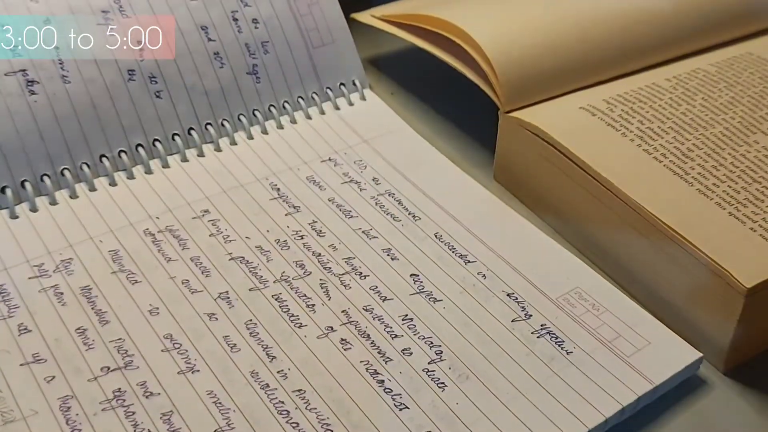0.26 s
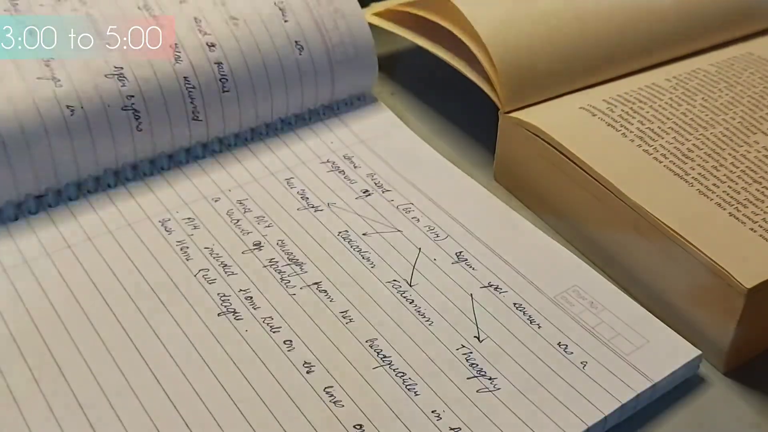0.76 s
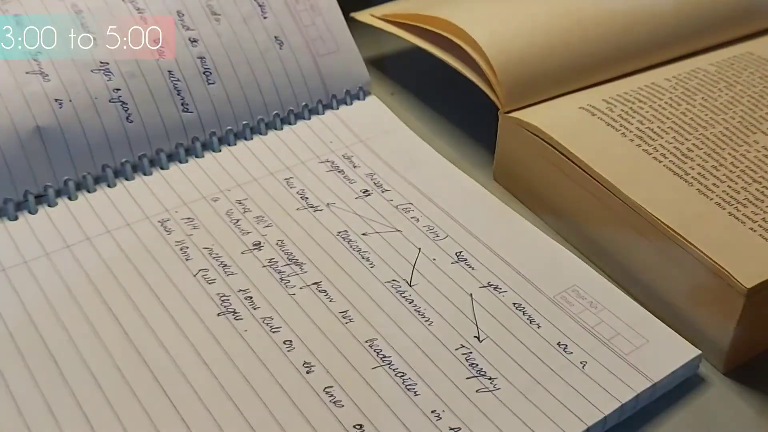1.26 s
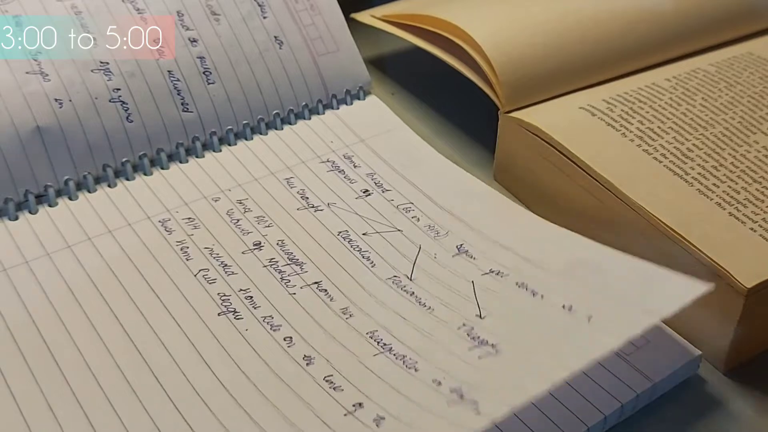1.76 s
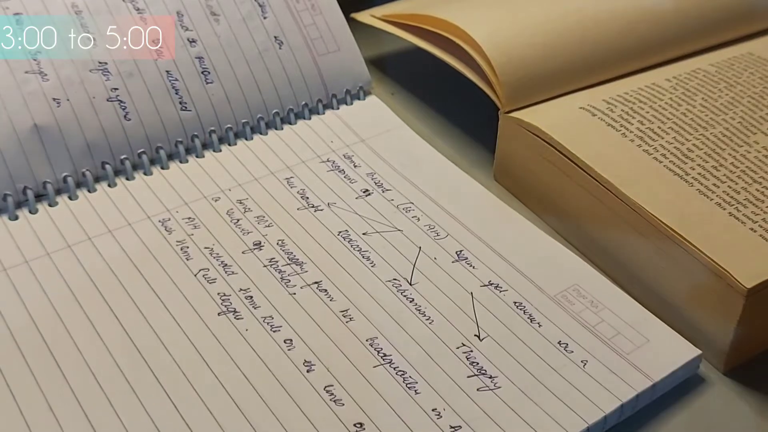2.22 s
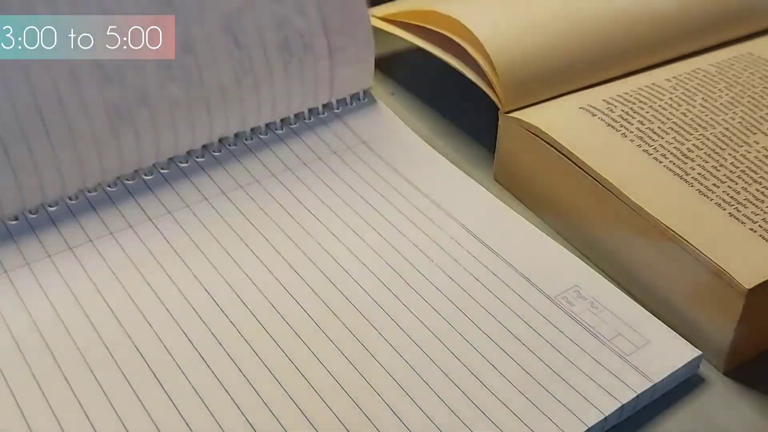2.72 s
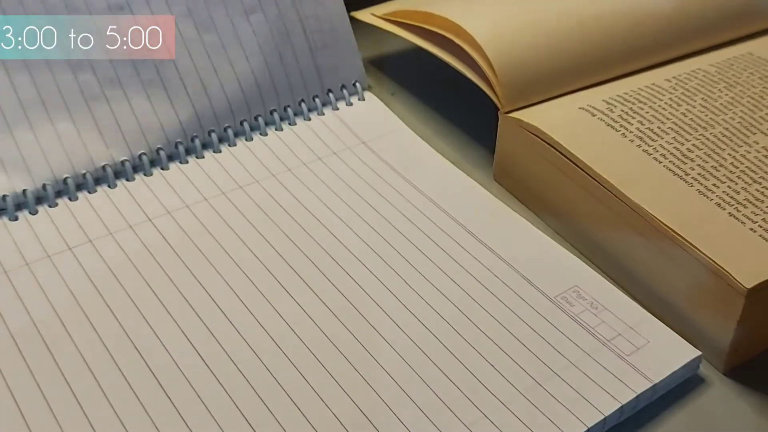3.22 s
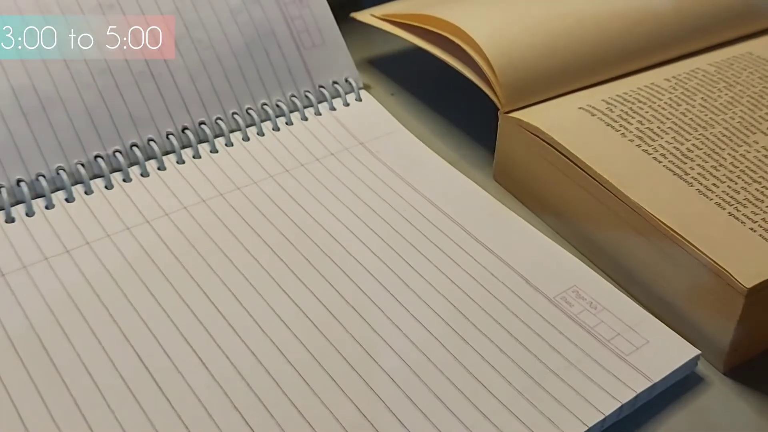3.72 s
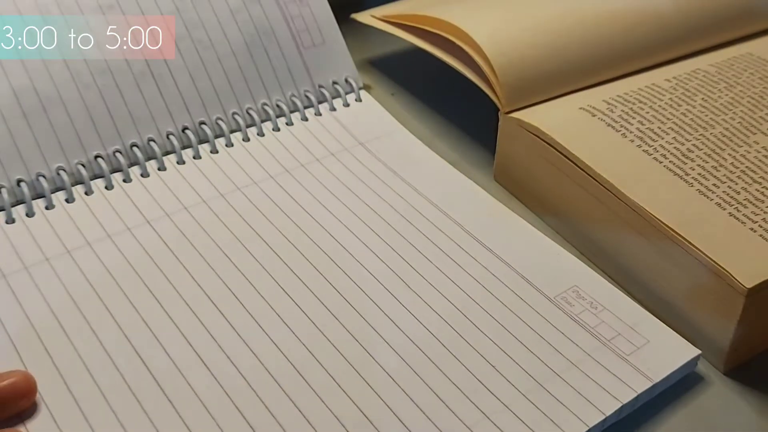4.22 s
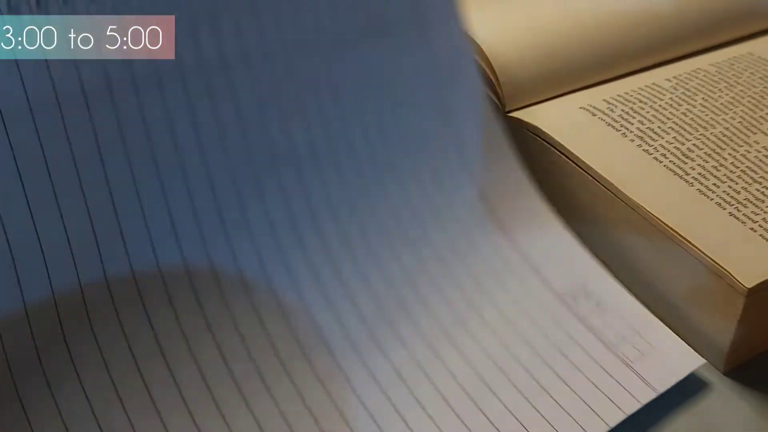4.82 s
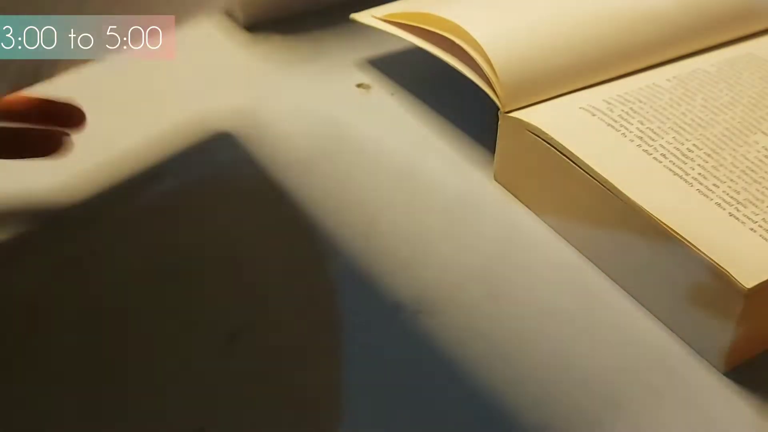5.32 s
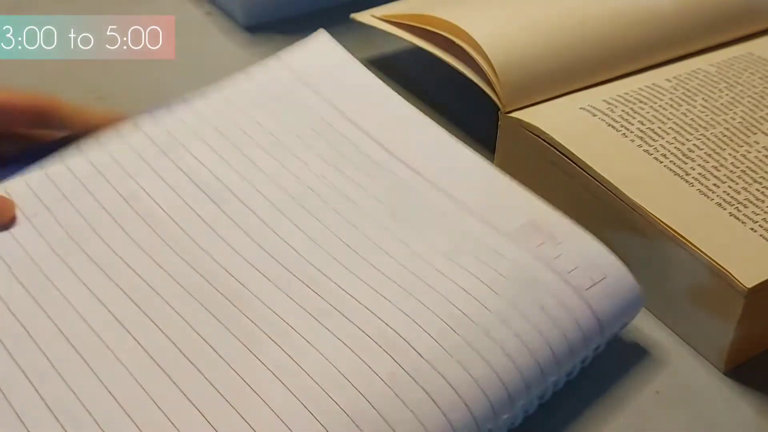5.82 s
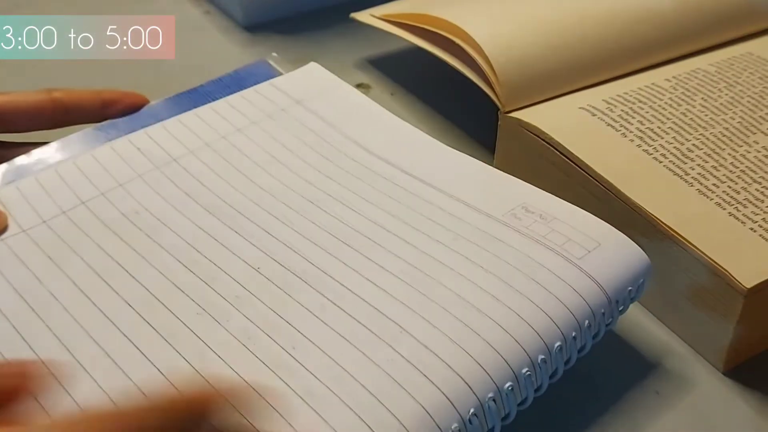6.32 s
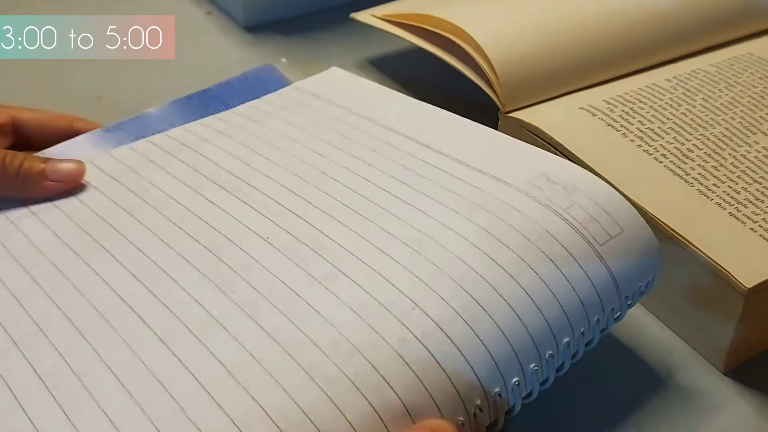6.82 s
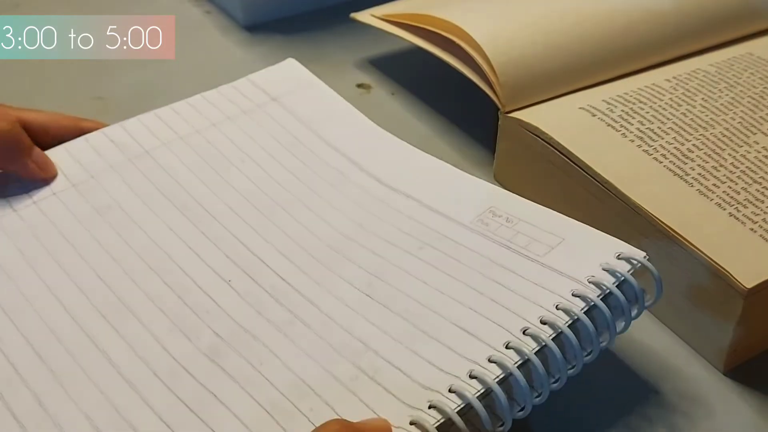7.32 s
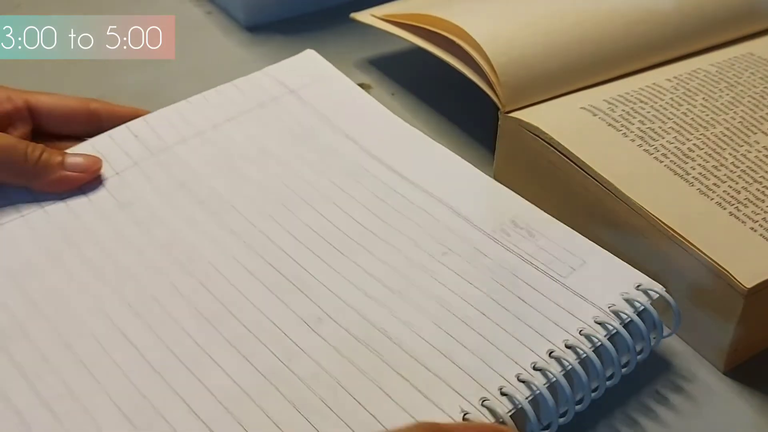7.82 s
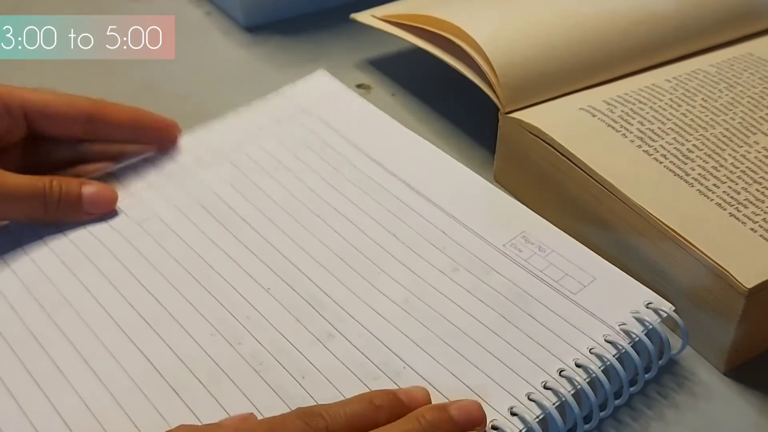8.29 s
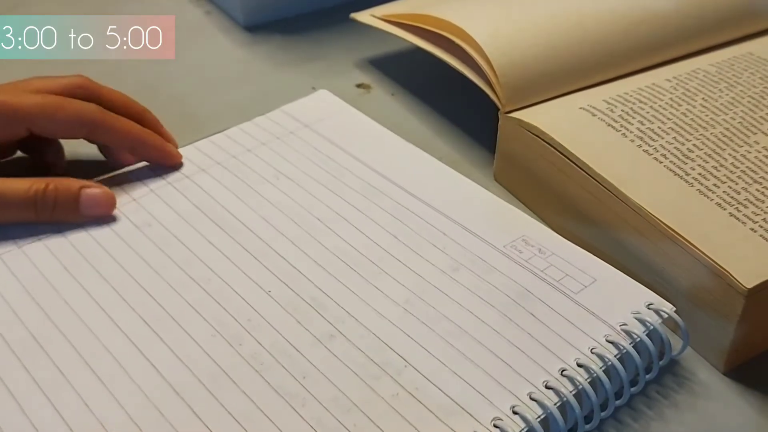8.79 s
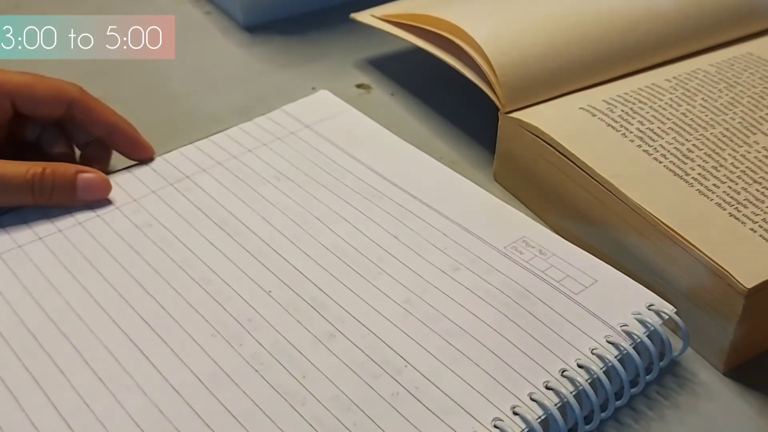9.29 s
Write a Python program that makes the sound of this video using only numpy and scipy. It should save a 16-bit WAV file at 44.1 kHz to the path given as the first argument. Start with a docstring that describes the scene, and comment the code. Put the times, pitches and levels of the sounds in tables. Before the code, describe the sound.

A quiet room with a low hum and slight microphone hiss; a very faint, far-off horn-like tone hovers at the start and again around 1.5-2.6 s. At 0.3 s a page swishes brightly, snapping hard at 0.5 s with flapping and crackling until about 0.8 s, the loudest moment. Light rustles and a faint hollow scrape follow from 1 s. Another page flips at 2.6-2.9 s with clean, sharp pops, then crinkles at 3.1-3.6 s. Soft brushing leads into the notebook being lifted and turned over around 4.7-5.7 s, with a muted scrape and small bumps. A crisp snap lands at 5.9 s. From 6 s hands shuffle and smooth the paper gently, the hollow desk answering in low soft booms, notably at 7.3 s, with a dull thud at 8.4 s and a low rumble just after. Faint rustling continues to 9.5 s. Close, dry stereo.

```python
"""A quiet room hums under a faint far-off tone, perhaps a horn; then hands turn the pages of a
ring-bound notebook, flip it over and smooth it flat on a hollow desk, close to two microphones.
Paper is shaped noise (hiss, crackle, flap) with snaps and clean pops; scrapes are resonant noise.
The desk top booms as ringing modes driven by knocks and by noise from the shuffling hands.
The tones are gliding sines, early on; the room is coloured noise, shared in the bass only."""
import sys
import numpy as np
from scipy import signal
from scipy.fft import rfft, irfft, next_fast_len
from scipy.io import wavfile
from scipy.ndimage import uniform_filter1d

SR = 44100
rng = np.random.default_rng(int(sys.argv[2]) if len(sys.argv) > 2 else 0)


def generate_wav(sig):
    """Save sig (samples, or channels by samples) to the path in sys.argv[1] as 16-bit PCM at SR."""
    pcm = np.round(np.clip(np.atleast_2d(sig).T, -1, 1) * 32767).astype(np.int16)
    wavfile.write(sys.argv[1], SR, pcm)


N = 421155  # length in samples
T = np.arange(N) / SR  # seconds


def paper():
    """Sliding hiss, bending crackle and page flap: noise under slow swells, fine grain and sharp snaps."""
    # each movement of the paper swells, holds and dies away; rise and fall are times per 20 dB:
    # full_at_s, rise_ms, hold_ms, fall_ms, hiss_db, crackle_db, flap_db
    moves = [(0.003, 61.0, 17, 102, -73, -77, -70.5), (0.142, 93.0, 30, 67, -68, -88, -79.0),
             (0.299, 16, 73, 22.0, -41, -48.5, -69), (0.387, 62, 30, 171, -29.5, -40.5, -68),
             (0.499, 74, 7.4, 193.0, -43, -34.5, -36.5), (0.616, 161.0, 46, 112, -36, -36, -36.5),
             (0.953, 7, 34.0, 78.0, -69, -60.0, -54), (1.07, 131, 54, 128, -61.5, -54, -54),
             (1.167, 78.0, 13.0, 132.0, -61.0, -53.5, -75), (1.262, 42, 19, 86, -67, -61.5, -54),
             (1.367, 10.0, 21, 215, -83, -64.5, -65.5), (1.536, 264, 6.1, 299, -65.5, -87.0, -79),
             (1.724, 80, 43, 193, -53, -58.5, -66.5), (1.823, 15.0, 15.0, 251.5, -69.0, -73, -67.5),
             (2.053, 4, 49, 145, -62.5, -60, -62.0), (2.08, 9, 6.0, 392, -62, -84.5, -63.5),
             (2.416, 85.5, 24, 124, -65.5, -81, -93), (2.577, 11, 58, 25.0, -50, -54.5, -46.5),
             (2.598, 244, 10.0, 20.0, -58.5, -63, -77.0), (2.676, 91, 27, 155.0, -56, -55, -41.5),
             (2.777, 67, 20, 88, -38.5, -38, -37.5), (2.888, 72, 30, 105, -53.5, -55, -53.5),
             (3.154, 11, 52, 218.0, -51, -51, -48), (3.247, 60, 20, 92, -49, -41, -43),
             (3.416, 207, 38, 138, -62, -47.5, -54.0), (3.502, 49, 18, 148, -44.5, -42, -49.0),
             (3.705, 398.0, 48, 12, -57.5, -73, -67), (3.865, 408, 68, 72.5, -51, -68, -74.5),
             (4.394, 106.0, 7.5, 100, -66.5, -80.5, -78), (4.499, 78, 59.0, 395, -71.0, -81.5, -71.5),
             (4.669, 96, 43.0, 388.0, -61, -66, -63), (4.74, 47, 29, 89.0, -55.5, -64.5, -70),
             (4.849, 90.0, 14, 194.0, -66, -72, -57.5), (4.957, 91, 91.0, 34.0, -57, -65, -63),
             (5.079, 140, 16, 112, -54.0, -60.5, -60.5), (5.178, 35, 23, 198, -61.0, -65.0, -56.5),
             (5.284, 49, 12, 20, -58.5, -60.5, -55.5), (5.386, 13.0, 70, 145, -62, -68.5, -65.5),
             (5.574, 141.0, 16.0, 89.0, -68.0, -72, -71), (5.716, 41, 14, 26, -64, -60.5, -47.5),
             (5.743, 263.0, 120, 263.0, -61.5, -65, -59.5), (5.892, 49, 4.0, 144, -50, -50, -49.5),
             (6.126, 398.0, 33, 53.0, -71, -72, -60), (6.235, 176.0, 17.0, 109.0, -72.5, -70.5, -68.5),
             (6.393, 15, 26, 36, -48.0, -60.5, -64), (6.506, 260, 38.0, 197.0, -59, -64.5, -74),
             (6.58, 8, 28.0, 154.0, -59, -68.0, -70), (6.697, 52.0, 14, 111, -64.5, -72, -61.5),
             (6.769, 27.0, 20.0, 86, -72, -66, -64.5), (6.833, 129.0, 120, 74, -69, -70, -70.5),
             (7.145, 160.0, 40, 20, -57.5, -59, -55), (7.236, 186.0, 66, 63, -56.0, -59, -56),
             (7.333, 153.0, 8.4, 351.5, -72.5, -86, -70.5), (7.725, 128.0, 5.0, 275.0, -63.5, -66, -64.5),
             (7.953, 54, 20.0, 228.0, -71.0, -72.5, -71), (8.062, 126, 8.0, 115, -59.5, -69.0, -70),
             (8.162, 30, 21.0, 160, -65, -72, -67), (8.346, 72.0, 6.7, 392.0, -67.5, -78.5, -68.5),
             (8.474, 63.0, 13, 46.0, -65.5, -79.0, -69), (8.586, 116, 30, 206.0, -61.0, -74, -68),
             (8.79, 171.0, 97, 208, -68.5, -82, -72), (8.996, 62, 66.0, 80.0, -70.5, -84, -69.5),
             (9.174, 287.0, 12.5, 78, -62.5, -69, -67), (9.28, 196, 7.6, 54.0, -68.5, -72.5, -86.5)]
    # the lower layers swell and die more slowly; one row each for hiss, crackle, flap:
    # rise_stretch, fall_stretch [factors]
    stretches = [(1, 1), (1.1, 1.3), (1.2, 1.51)]
    # the sheet buckles or slaps: start_s, crackle_peak_db, hiss_peak_db, flap_peak_db,
    # t60_s (kept within 0.004 to 0.09)
    snaps = [(0.2872, -59, -33.5, -55, 0.0096), (0.4881, -16, -23.5, -25.5, 0.029),
             (0.554, -31.5, -48, -36, 0.035), (0.6352, -32.5, -42, -28, 0.026),
             (0.696, -34, -60, -53.5, 0.024), (0.7206, -41.5, -71, -47.5, 0.15),
             (0.7476, -47, -50, -35.5, 0.065), (0.9519, -46, -69, -39, 0.015),
             (1.1708, -48, -47, -51, 0.019), (1.2896, -44.5, -64, -52, 0.009),
             (1.3627, -42.5, -51, -48.5, 0.017), (1.827, -55, -55, -64, 0.032),
             (2.047, -66, -71, -70, 0.017), (2.0818, -43, -43.5, -49, 0.028),
             (2.2435, -59, -50.5, -70, 0.011), (2.5633, -57.5, -76, -45, .012),
             (2.58, -43, -68, -40.5, 0.0086), (2.6142, -37.5, -71, -44, 0.05),
             (2.6764, -65, -70, -38, 0.017), (2.7303, -30.5, -63, -31.5, 0.039),
             (2.7684, -31.5, -27, -55.5, 0.016), (2.7866, -32.5, -54, -48.5, 0.044),
             (3.1745, -43, -55, -54, 0.04), (3.2265, -39, -63, -46.5, 0.012),
             (3.2546, -35, -53, -57, 0.013), (3.3256, -39.5, -54, -49, 0.0095),
             (3.475, -36.5, -70, -59, 0.0093), (4.9122, -60, -55, -52, 0.02),
             (5.0814, -49, -55, -58, 0.026), (5.1921, -78, -55, -36.5, 0.0099),
             (5.6436, -75, -60, -55, 0.01), (5.715, -56, -75, -55, 0.009), (5.772, -63, -73, -67, 0.014),
             (5.8912, -40, -33, -43, 0.016), (5.8985, -29, -43, -28.5, 0.014),
             (6.1554, -56, -62, -58, 0.024), (6.382, -69, -53, -80, 0.029), (6.6976, -66, -72, -60, 0.017),
             (6.228, -65, -80, -56, 0.013), (6.779, -68, -80, -59, 0.025), (7.0066, -69, -82, -55, 0.016),
             (7.0626, -55, -70, -67, 0.0083), (7.9517, -62, -56.5, -65, 0.029),
             (8.1701, -55.5, -54, -51, 0.014), (8.361, -70, -67, -50, 0.0083),
             (8.4715, -70, -74, -67, 0.027), (8.562, -70, -54, -70, 0.01)]
    # single clean pops of a flattening fold, level ahead of the stereo split:
    # peak_s, peak_db, centre_hz
    pops = [(.2865, -44, 9000), (.7505, -24, 450), (.955, -34, 617), (1.362, -56, 4960), (2.245, -54, 5960),
            (2.731, -18, 1310), (2.77, -9, 6000), (5.191, -39.5, 350), (5.8993, -29, 2500),
            (8.562, -57, 5000)]
    # relative spectrum of each layer: pitch_hz, level_db
    hiss = [(2200, -28.5), (3000, -6), (5000, 0), (8000, -0.5), (11500, 1.5), (14000, -1.5), (16000, -6.5)]
    crackle = [(1000, -25.5), (1500, -12), (2000, -6.5), (2400, -4), (2900, -6.5), (4300, -7.5),
               (6000, -13), (9000, -23.5)]
    flap = [(130, -13), (200, -10.5), (300, -2.5), (460, -3.5), (800, -5.5), (1200, -8), (1700, -10.5),
            (2300, -18)]

    full_at, rise, hold, fall, *layer_dbs = np.transpose(moves)
    levels = [swells(full_at, rise_stretch * rise, hold, fall_stretch * fall, db)
              for db, (rise_stretch, fall_stretch) in zip(layer_dbs, stretches)]
    grains = (grainy(per_s=380, spread_db=3.5, grain_s=0.0079, share=0.65),
              grainy(per_s=750, spread_db=4.5, grain_s=0.0034, share=0.84),
              grainy(per_s=28, spread_db=5.5, grain_s=0.024, share=0.4))

    out = scrapes()
    t = np.arange(4000) / SR
    bursts = np.zeros((3, N))
    for start, crackle_db, hiss_db, flap_db, t60 in snaps:
        t60 = np.clip(t60, 0.004, 0.09)
        attack = (1 - np.exp(-t / (0.013 * t60))) ** 2
        shape = attack * gain_of(-60 * t / t60)
        for burst, db in zip(bursts, (hiss_db, crackle_db, flap_db)):
            add(burst, start, gain_of(db) * shape / shape.max())

    for slow, grain, burst, colour in zip(levels, grains, bursts, (hiss, crackle, flap)):
        level = slow * grain + burst
        out += coloured(level * rng.standard_normal((3, N)), colour)

    lead_s = 0.004  # each pop's pulse peaks this long after its first sample
    for peak_s, db, hz in pops:
        u = (np.pi * hz * (t[:400] - lead_s)) ** 2
        pulse = (2 * u - 1) * np.exp(-u)  # one sharp dip between two softer humps
        add(out[0], peak_s - lead_s, gain_of(db) * pulse)
    return heard(out)


def scrapes():
    """The book scrapes on the desk: rubbing noise in one hollow resonance of the gap under it."""
    # rms level ahead of the fade and stereo split: start_s, end_s, pitch_hz, width_hz, level_db
    rubs = [(0.958, 1.34, 486, 89, -58.5), (4.476, 4.594, 820, 202.4, -70.5), (4.754, 4.965, 694, 137, -54),
            (7.05, 7.3, 840, 248, -56.5)]
    out = np.zeros((3, N))
    for start, end, hz, width, db in rubs:
        rub = signal.lfilter(*signal.iirpeak(hz, hz / width, SR), rng.standard_normal((3, N)))
        fade = np.sin(np.pi * np.clip((T - start) / (end - start), 0, 1))
        out += gain_of(db) * evened(rub) * fade
    return out


def heard(x):
    """The direct sound (first row) reaches the right microphone later; the rest scatters off desk and books."""
    # where the paper is: time_s, right_delay_ms, left_over_right_db
    place = [(0, 0.33, 5), (.45, 0.27, 2), (.6, 0.29, 2), (1, 0.35, 0.5), (1.6, 0.29, 1), (2.2, 0.26, 3.5),
             (2.9, 0.36, 2), (3.2, 0.045, 1), (3.8, 0.3, 1.7), (4.3, .3, 2.5), (5.3, 0.29, 2),
             (5.699, 0.19, 2), (6.3, 0.16, 2), (7.201, 0.015, 1), (8.2, 0.15, 2.5), (9.55, 0.25, 4.5)]
    # how alike the two sides are: pitch_hz, shared_power [0 to 1]
    likeness = [(100, 0.86), (300, 0.96), (700, 0.21), (1500, 0.57), (3000, 0.37), (7000, 0.35),
                (15000, 0.7)]
    hz, t, z = signal.stft(x, SR, nperseg=256, noverlap=192)

    # the bending sheet keeps changing colour
    patches = uniform_filter1d(rng.standard_normal(z.shape[1:]), 3, 0)
    patches = uniform_filter1d(patches, 30, 1)
    z = z * gain_of(2.0 * evened(patches))  # 2 dB rms

    time_s, delay_ms, pan_db = np.transpose(place)
    # the delay between the sides fades out from 5 to 7 kHz
    late = hz * np.clip((7000 - hz) / 2000, 0, 1)
    # half the delay and half the pan go to each side, in opposite senses
    turn = np.exp(1j * np.pi * late[:, None] * np.interp(t, time_s, delay_ms) / 1000)
    lean = gain_of(np.interp(t, time_s, pan_db) / 2)

    at_hz, share = np.transpose(likeness)
    alike = np.interp(np.log(hz + 1), np.log(at_hz), share)
    alike = np.clip(alike, 0, 1)[:, None]
    direct = np.sqrt(alike) * z[0]
    apart = np.sqrt(1 - alike) * z[1:]
    left = (direct * turn + apart[0]) * lean
    right = (direct / turn + apart[1]) / lean
    return signal.istft(np.array([left, right]), SR, nperseg=256, noverlap=192)[1][:, :N]


def desk():
    """Soft knocks and a shuffle of hands drive the same modes of the desk top."""
    # ringing modes of the board, undamped: pitch_hz, level_db, t60_s
    modes = [(96.5, -9, 0.79), (120.6, 0, 0.63), (130.4, -4, 1.1), (149, -17.5, 0.78), (183.7, -6, .6),
             (205.5, -17, .5), (254, -14, 0.88), (271, -16.5, 0.44), (300, -16, 0.53), (308, -18.5, 0.87),
             (348, -18.5, 0.51), (438, -25, 0.32)]
    # hands and book lean on the desk top; rise and fall are times per 20 dB:
    # full_at_s, rise_ms, hold_ms, fall_ms, level_db (of the driving noise)
    presses = [(0.272, 231, 6.0, 40.0, -78), (0.48, 92.0, 5.0, 104.0, -49), (0.631, 388.0, 101.0, 210, -52),
               (0.724, 20, 16, 212.0, -53), (0.913, 15.0, 28.0, 391.0, -78),
               (1.134, 179.0, 7.0, 232.0, -62.5), (1.324, 407.0, 170, 48, -63.5),
               (2.025, 114.0, 88, 19.5, -67), (2.197, 80, 47, 43.5, -64.0), (2.552, 31.0, 43.0, 15.0, -62),
               (2.727, 189.0, 5.3, 127.0, -42.5), (3.197, 217.0, 5.0, 357.0, -51.5),
               (3.38, 9, 55.0, 162.0, -56), (3.522, 6.0, 269.0, 65.0, -59.5), (3.888, 92.0, 44, 69.0, -56),
               (4.08, 312.5, 58, 73.5, -64.5), (4.32, 216.5, 29.0, 98.5, -65.5),
               (4.576, 348, 7.0, 114, -62.5), (4.804, 144.0, 7.0, 221.0, -59.5),
               (5.171, 365.0, 4.0, 404, -56.5), (5.727, 99, 4.3, 143, -47), (5.866, 41, 29, 197, -45),
               (6.032, 9.0, 75, 114, -52.5), (6.132, 95, 7.3, 181.0, -52.5), (6.347, 45, 64, 74, -58.5),
               (6.61, 272.0, 8.3, 129, -52), (6.817, 409, 100, 406.0, -65),
               (7.278, 134.0, 4.4, 177.5, -46.0), (7.498, 45, 125.0, 169, -60.5),
               (8.223, 209, 7.3, 58.0, -49.5), (8.529, 233, 8.8, 156, -41), (8.717, 29, 43.0, 377.0, -53),
               (8.968, 39.0, 19.0, 151, -52.5), (9.275, 407.0, 47.0, 406, -65.5)]
    # the desk is knocked, peak ahead of the bass cut and pan: start_s, peak_db
    blows = [(5.19, -47.5), (5.71, -50), (5.9, -52), (8.36, -18.5)]
    rest_db = -78.5  # hands resting

    t = np.arange(SR) / SR
    ring = sum(gain_of(db - 60 * t / t60) * np.sin(2 * np.pi * hz * t) for hz, db, t60 in modes)

    pressure = swells(*np.transpose(presses)) + gain_of(rest_db)
    # nearly the same noise drives both sides
    shuffle = pressure * (rng.standard_normal(N) + 0.05 * rng.standard_normal((2, N)))
    damped = ring * gain_of(-250 * t)  # resting hands shorten the ring
    boom = signal.oaconvolve(shuffle, damped[None] / np.linalg.norm(damped))[:, :N]

    padded_blow = np.exp(-((t[:300] - 0.002) / 0.00058) ** 2)
    thud = np.convolve(ring, padded_blow)
    knocks = np.zeros(N)
    for start, peak_db in blows:
        add(knocks, start, gain_of(peak_db) * thud / abs(thud).max())

    bass_cut = signal.butter(2, 75, "high", fs=SR, output="sos")
    left, right = signal.sosfilt(bass_cut, boom + knocks)
    # the right microphone is further along the board: 12 samples later there
    return np.array([left, np.roll(right, 12)]) * gain_of([[-0.7], [0.7]])


def tones():
    """Faint far notes: sines, two with an audible lower octave, that drift a little and fade in and out."""
    # levels ahead of the waver and fades:
    # start_s, end_s, start_hz, end_hz, level_db, octave_below_level_db (-110: inaudible)
    notes = [(0.01, 0.398, 1428, 1413, -71, -110), (1.444, 2.1, 1338, 1350, -85.5, -80),
             (1.614, 1.852, 580, 583, -71.5, -110), (2.194, 2.62, 1300, 1304, -77.5, -82.5)]
    out = np.zeros(N)
    for start, end, from_hz, to_hz, db, low_db in notes:
        turns = np.cumsum(np.linspace(from_hz, to_hz, round((end - start) * SR))) / SR
        note = gain_of(db) * np.sin(2 * np.pi * turns)
        note = note + gain_of(low_db) * np.sin(np.pi * turns)
        waver = uniform_filter1d(rng.standard_normal(len(note)), 1500)
        waver = evened(uniform_filter1d(waver, 1500))
        fades = signal.windows.tukey(len(note), 0.4)
        add(out, start, note * gain_of(2.5 * waver) * fades)
    return out


def room():
    """Steady low hum of the room, shared by both sides, and the separate hiss of each microphone."""
    # relative noise spectrum: pitch_hz, density_db (per Hz)
    spectrum = [(25, -19), (50, 6.5), (70, -11), (125, -4.5), (160, -18.5), (195, -11), (300, -12.5),
                (500, -33), (1000, -33), (2000, -37.5), (5000, -37.5), (8000, -37.5), (12000, -29.5),
                (16000, -38.5)]
    level_db = -68
    a, b, c = rng.standard_normal((3, N))
    shared = coloured(a, spectrum)
    apart = coloured(np.array([b, c]), spectrum)
    bass = signal.butter(1, 600, fs=SR, output="sos")
    # shared in the bass, separate above
    return gain_of(level_db) * (signal.sosfilt(bass, shared - apart) + apart)


def swells(at, rise_ms, hold_ms, fall_ms, db, step=64):
    """Gain curve of events that swell, hold, die away and add in power, worked out every step samples."""
    rise_bend, fall_bend = 1.1, 0.97  # above 1: round at the top, steep at the foot
    ms = 1000 * (T[::step, None] - at)
    before = np.maximum(-ms, 0) / np.maximum(rise_ms, 2)
    after = np.maximum(ms - hold_ms, 0) / np.maximum(fall_ms, 2)
    drop_db = 20 * (before ** rise_bend + after ** fall_bend)
    power = gain_of(db - drop_db) ** 2
    return np.interp(T, T[::step], np.sqrt(power.sum(1)))


def grainy(per_s, spread_db, grain_s, share):
    """An envelope of rms 1: a steady bed plus tiny decaying slips of very uneven size."""
    size = gain_of(spread_db * np.minimum(rng.exponential(1, N), 4))
    size = size * (rng.random(N) < per_s / SR)
    fall = np.exp(-1 / (grain_s * SR))
    slips = evened(signal.lfilter([1], [1, -fall], size))
    return evened(1 + share * slips)


def coloured(x, points):
    """Filters the last axis by a (Hz, dB) spectrum, keeping the power of white noise."""
    size = next_fast_len(N + 4096)
    hz, db = np.transpose(points)
    # steep skirts: 50 dB down two octaves beyond each end
    hz = np.r_[hz[0] / 4, hz, hz[-1] * 4]
    db = np.r_[db[0] - 50, db, db[-1] - 50]
    bins_hz = np.fft.rfftfreq(size, 1 / SR)
    shape = evened(gain_of(np.interp(np.log(bins_hz + 1), np.log(hz), db)))
    return irfft(rfft(x, size) * shape, size)[..., :N]


def gain_of(db):
    """Decibels to gain."""
    return 10 ** (np.asarray(db) / 20)


def evened(x):
    """Scales to rms 1."""
    return x / np.sqrt(np.mean(x ** 2) + 1e-20)


def add(mix, start_s, sound):
    """Adds a sound into the mix at a time."""
    part = mix[round(start_s * SR):][:len(sound)]
    part += sound[:len(part)]


def scene():
    """Everything at the two microphones."""
    return paper() + desk() + tones() + room()


def record(dry):
    """The microphones lose the deepest bass; then a steep band limit cuts the top treble."""
    edge_hz = 15950
    thin = signal.sosfilt(signal.butter(4, 40, "high", fs=SR, output="sos"), dry)
    band_limit = signal.firwin(1023, edge_hz, window=("kaiser", 9), fs=SR)
    return signal.oaconvolve(thin, band_limit[None], "same")


dry = scene()
out = record(dry)
generate_wav(out)
```